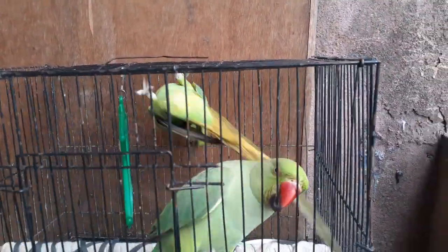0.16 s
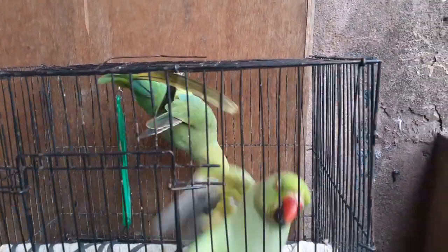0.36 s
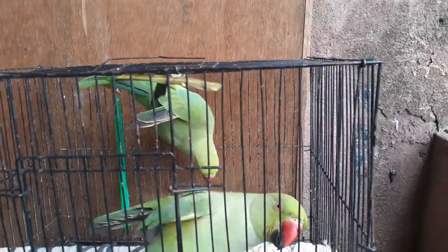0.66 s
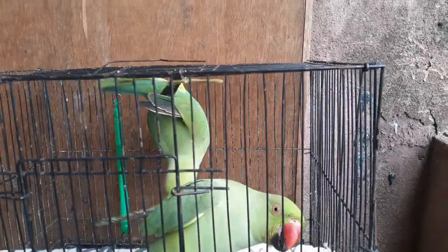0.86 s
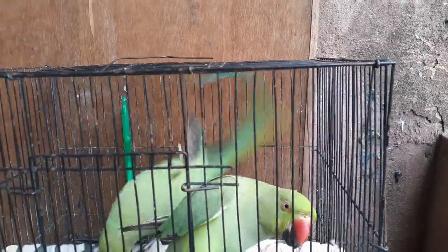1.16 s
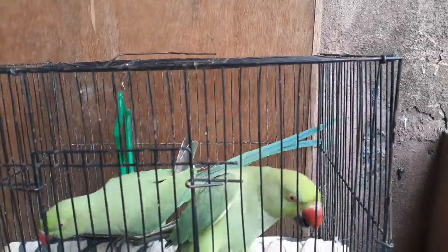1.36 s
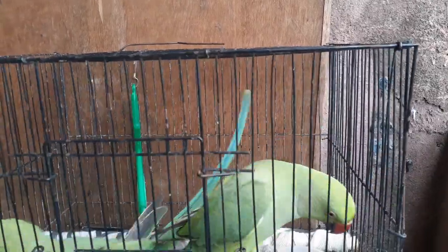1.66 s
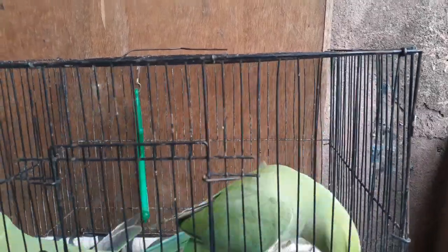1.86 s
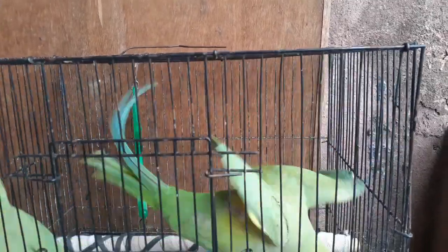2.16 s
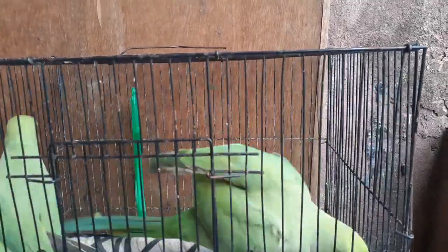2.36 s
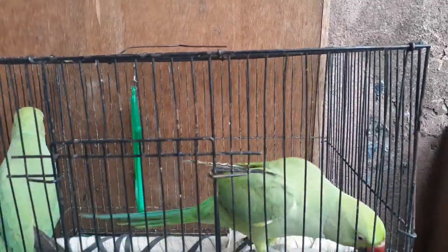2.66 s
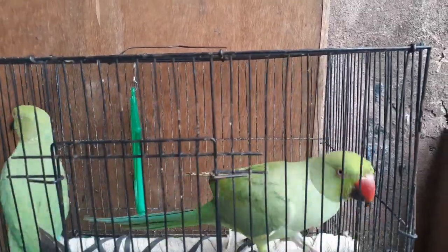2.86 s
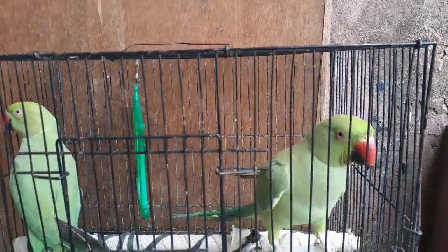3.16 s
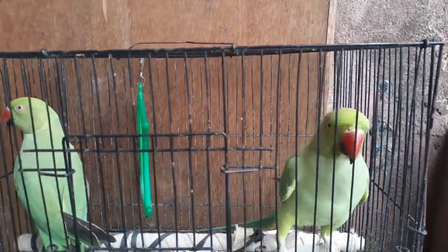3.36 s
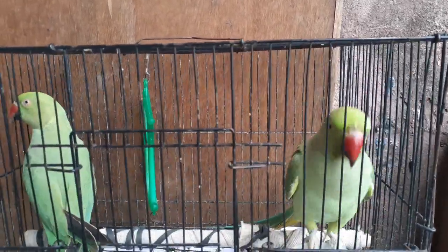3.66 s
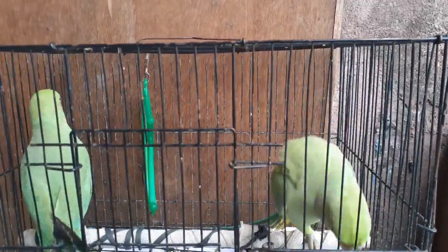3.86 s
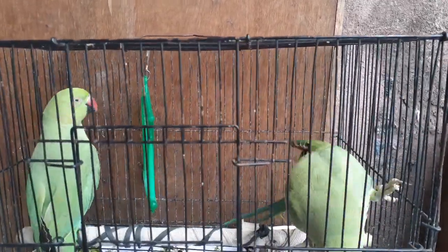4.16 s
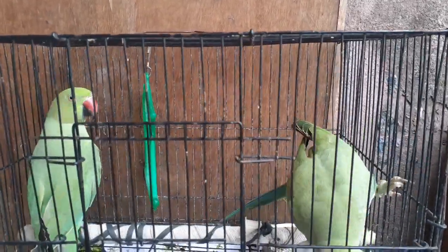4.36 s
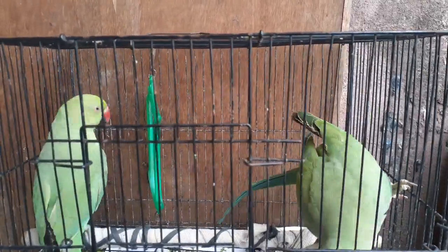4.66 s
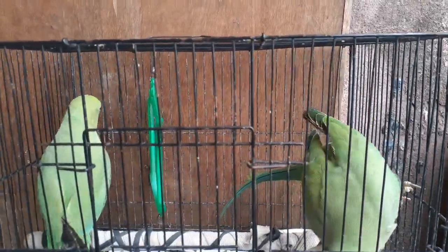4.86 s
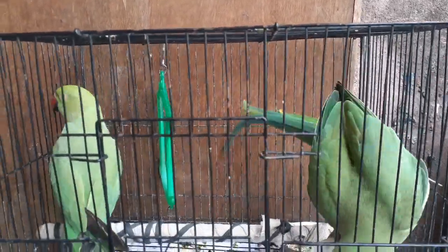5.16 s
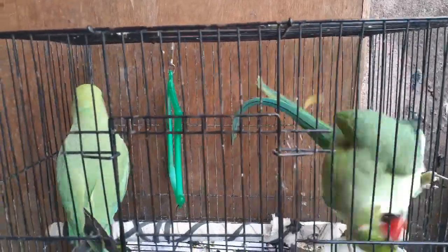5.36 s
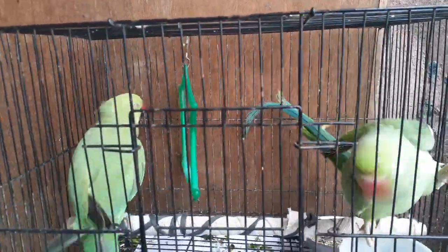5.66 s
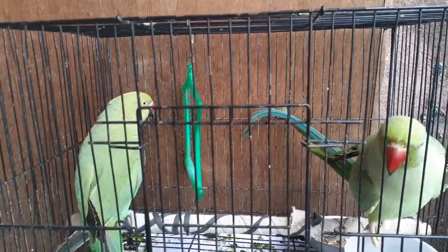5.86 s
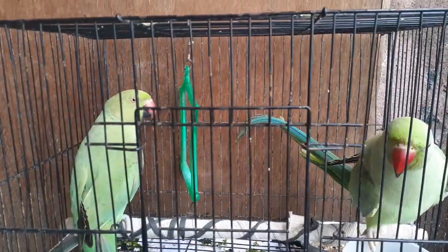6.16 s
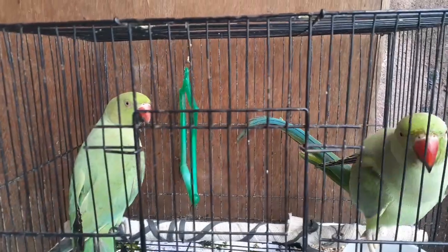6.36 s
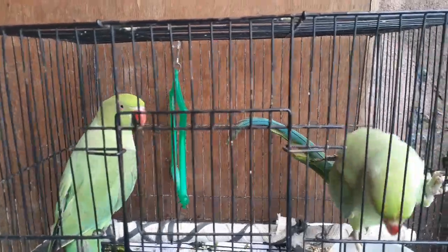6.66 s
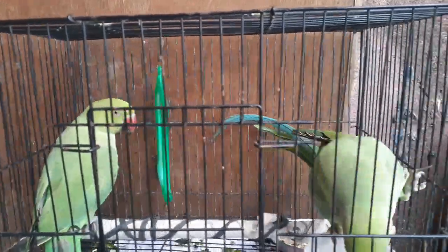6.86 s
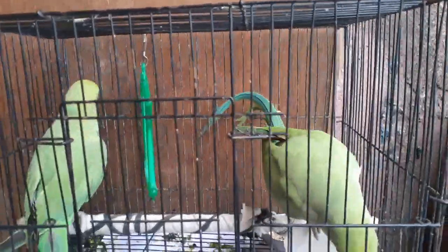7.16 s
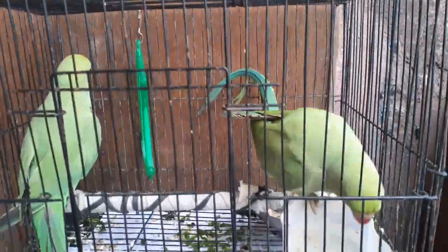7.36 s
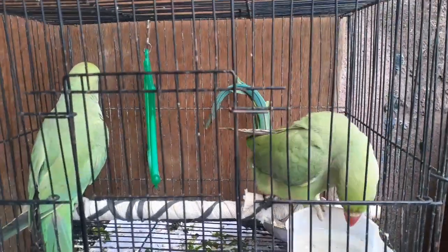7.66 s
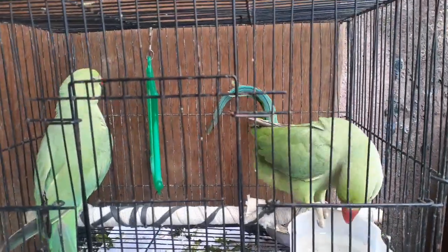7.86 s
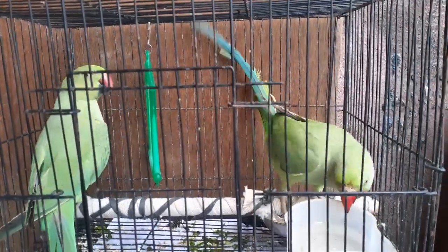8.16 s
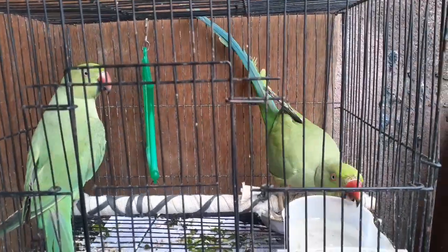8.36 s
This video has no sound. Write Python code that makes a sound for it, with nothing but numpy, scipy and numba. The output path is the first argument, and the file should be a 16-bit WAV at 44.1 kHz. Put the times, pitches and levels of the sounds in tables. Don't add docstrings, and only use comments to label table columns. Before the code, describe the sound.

Close phone pickup of a wire cage in a small hard-walled yard. The tail of a shrill parakeet squawk opens it, then claws and beak tick on ringing wires as a bird clambers down, loudest with a sharp clack about two seconds in. Ticks thin out, then three more piercing squawks rise and fall quickly. Light feather and paper rustle, low town hum beneath.

```python
import sys
import numpy as np
from scipy import signal
from scipy.fft import rfft, irfft, next_fast_len
from scipy.io import wavfile
from scipy.ndimage import uniform_filter1d, minimum_filter1d
from numba import njit

SR = 44100
rng = np.random.default_rng(int(sys.argv[2]) if len(sys.argv) > 2 else 0)


def transcribe(signal):
    frames = np.atleast_2d(signal).T
    limited = np.clip(frames, -1, 1)
    pcm = np.round(limited * 32767).astype(np.int16)
    wavfile.write(sys.argv[1], SR, pcm)


def nominal_scale(level):
    x = np.asarray(level, float) / 20
    return 10 ** x


N = 375291
T = np.arange(N) / SR


def on_log(hz, points):
    f, v = np.transpose(points)
    return np.interp(np.log(np.maximum(hz, 1)), np.log(f), v)


def colour(x, points):
    size = next_fast_len(x.shape[-1])
    gain = nominal_scale(on_log(np.fft.rfftfreq(size, 1 / SR), points))
    return irfft(rfft(x, size) * gain, size)[..., :x.shape[-1]]


def band(x, lo_hz, hi_hz):
    y = signal.sosfilt(signal.butter(2, [lo_hz, hi_hz], "band", fs=SR, output="sos"), x)
    return y / y.std()


def walk(rate_hz):
    hold = int(SR / rate_hz)
    steps = np.repeat(rng.standard_normal(N // hold + 1), hold)
    smooth = uniform_filter1d(uniform_filter1d(steps, hold), hold)[:N]
    return smooth / smooth.std()


def ports(x, pan_db, lag):
    late = np.concatenate([np.zeros(lag), x[:N - lag]])
    return np.array([late * nominal_scale(pan_db / 2), x * nominal_scale(-pan_db / 2)])


def arch(t, s, v):
    slope = np.diff(v) / np.diff(s)
    before, after = slope[:-1], slope[1:]
    inner = np.where(after * before > 0, 2 * after * before / (after + before + 1e-9), 0)
    tangent = np.r_[slope[0], inner, slope[-1]]
    i = np.clip(np.searchsorted(s, t) - 1, 0, len(s) - 2)
    h = s[i + 1] - s[i]
    u = np.clip((t - s[i]) / h, 0, 1)
    bend = (1 - u) * (tangent[i] - slope[i]) - u * (tangent[i + 1] - slope[i])
    return v[i] + h * u * (slope[i] + (1 - u) * bend)


# f/Hz, then level/dB of the first voice, of sums and of doubled sums
SECOND_MEMBRANE = (2740, -10, -17, -14)
# start t/s, end t/s
CRACK = (6.513, 6.557)
# f/Hz, level/dB
THROAT_TONE = [(600, -21.5), (1000, -23), (1400, -12.5), (2000, -11.5), (2450, 0.5), (2900, 8), (3400, -5),
               (4300, -6), (5300, -11), (6500, -8.5), (7400, -18), (8500, -19.5), (10000, -34.5),
               (13000, -33), (16000, -46.5)]


def squawk(rows, waver, flutter, breath):
    s, pitch, *columns = np.array(rows, float).T
    span = slice(int(s[0] * SR), int((s[-1] + 0.016) * SR))
    t = T[span]
    db, bright_db, rough = (np.interp(t, s, c) for c in columns)
    second_hz, first_db, sum_db, twice_db = SECOND_MEMBRANE
    both = np.clip(np.minimum(t - CRACK[0], CRACK[1] - t) / .003, 0, 1)
    rough = np.clip(rough, 0, 1) + .3 * both
    hz = arch(t, s, pitch) * (1 + .08 * rough * waver[span])
    phase = 2 * np.pi * np.cumsum(hz) / SR
    second_phase = 2 * np.pi * second_hz * np.cumsum(1 + .008 * waver[span][::-1]) / SR

    harmonics = [(k, 0) for k in range(1, 22)]
    mixtures = [(k, n) for n in (1, 2) for k in range(1 - n, 4)]
    k, n = np.array(harmonics + mixtures).T[..., None]
    second_alone = nominal_scale(-12.0 * (n - 0.46))
    sums = nominal_scale(np.where(n == 1, sum_db, twice_db))
    share = np.where(n == 0, nominal_scale(first_db * both), both * np.where(k == 0, second_alone, sums))
    f = k * hz + n * second_hz
    gain = share * nominal_scale(on_log(f, THROAT_TONE) + bright_db * np.log2(f / 3000)) * (f < 16000)
    gain /= np.sqrt(uniform_filter1d((gain ** 2).sum(axis=0) / 2, size=500))
    own = flutter[np.arange(len(t)) + 5000 * np.arange(len(k))[:, None] + span.start // 2]
    gain *= nominal_scale(np.minimum(1.4 * f / 3000, 6.5) * own)
    voice = (gain * np.sin(k * phase + n * second_phase + k ** 2)).sum(axis=0)

    fade_in = np.clip((t - s[0]) / 0.0017 + (s[0] == 0), 0, 1)
    fade_out = np.clip((t[-1] - t) / .01, 0, 1) ** 2
    out = np.zeros(N)
    out[span] = (voice + 0.3 * rough * breath[span]) * nominal_scale(db) * fade_in * fade_out
    return out


# t/s, pitch f/Hz, level/dB
CALLS = [
    [(0.0, 1970, -18.5), (0.014, 1860, -17), (0.025, 1757, -14), (0.035, 1580, -13.5), (0.058, 1463, -15),
     (0.072, 1413, -10.5), (0.088, 1362, -12.5), (0.118, 1378, -16.5), (0.125, 1408, -22.5)],
    [(4.718, 1963, -15), (4.735, 2064, -11), (4.776, 2173, -15.5), (4.805, 2095, -12), (4.845, 1809, -16),
     (4.87, 1594, -15), (4.9, 1472, -13.5), (4.925, 1412, -15.5), (4.955, 1454, -20.5)],
    [(5.299, 1958, -18), (5.332, 2071, -16.5), (5.354, 2128, -20), (5.372, 2010, -18), (5.397, 1675, -20.5),
     (5.425, 1522, -13.5), (5.473, 1432, -13.5), (5.499, 1434, -15), (5.515, 1420, -24.5)],
    [(6.464, 1904, -19.5), (6.503, 2066, -20.5), (6.516, 2376, -18.5), (6.55, 2237, -19),
     (6.604, 1817, -20.5), (6.665, 1521, -13), (6.741, 1352, -15), (6.757, 1331, -9.5), (6.795, 1291, -22)],
]
# climb length t/s, first level/dB, climb level/dB, arch roughness [0-1],
# brightness [dB per octave]
CALL_OPENINGS = [
    (0, -20, -20, .17, 0.7),
    (.038, -18, -13, 0.12, 0.5),
    (.041, -33.5, -16, 0.11, -0.3),
    (.025, -32, -19.5, .06, -1.05),
]
# f/Hz, level/dB
BREATH_TONE = [(1500, -31.5), (3000, -15.5), (6000, -10), (9000, -17.5), (13000, -20.5), (16000, -23.5)]
CLIMB_FROM_HZ, CLIMB_CURVE, CLIMB_ROUGH = 570, 2.1, .3


def parakeet():
    waver, flutter = walk(500), walk(110)
    breath = colour(rng.standard_normal(N), BREATH_TONE)
    breath /= breath.std()
    out = 0
    for call, (length, first_db, climb_db, rough, bright_db) in zip(CALLS, CALL_OPENINGS):
        rows = [(*row, bright_db, rough) for row in call]
        s, top_hz, _ = call[0]
        climb = []
        for v in np.arange(6) / 6:
            hz = CLIMB_FROM_HZ + (top_hz - CLIMB_FROM_HZ) * v ** CLIMB_CURVE
            db = climb_db + (first_db - climb_db) * (1 - v) ** 6.1
            climb.append((s - length * (1 - v), hz, db, bright_db, CLIMB_ROUGH))
        out = out + squawk(climb + rows if s > 0 else rows, waver, flutter, breath)
    return out


# f/Hz, width f/Hz, level/dB
WIRE_MODES = [(3250, 240, -17), (3830, 1500, 2.5), (4900, 810, 0), (6480, 6900, 0), (10900, 3500, -3),
              (14220, 2500, -14)]
# t/s, peak level/dB, ring f/Hz, left minus right
# level/dB, treble tilt level/dB
WIRE_TICKS = [(0.1951, -24.5, 4800, -10.5, -4), (0.2423, -26, 4230, -10.5, -5),
              (0.3273, -29.5, 4090, -5.5, -1), (0.3377, -19, 3496, -8, -4),
              (0.41, -28, 3320, -6.5, -7.5), (0.7671, -39.5, 3320, -12, -26.5),
              (0.848, -35, 6566, -10.5, -8), (0.9058, -37, 3330, -10, -12),
              (0.9328, -41, 3380, -14.5, -4), (1.0847, -23.5, 8780, -13.5, -6),
              (1.2239, -31.5, 10500, -13, 0), (1.2496, -35, 4330, -19, 0), (1.37, -40.5, 8400, -4.5, 9),
              (1.6565, -24.5, 8400, -8.5, -1.5), (1.698, -39, 3580, -2, -12),
              (1.736, -30, 5170, -0.6, -4), (2.0014, -23.5, 9640, -8, -6), (2.06, -27.5, 3714, -3, -11),
              (2.0873, -8.5, 8200, -5.5, -1.5), (2.1057, -20, 3260, -5, -5.5),
              (2.112, -25.5, 4150, -0.6, -5),
              (2.21, -31, 3250, 1.5, -16), (2.2769, -37, 3420, -13, 1.1), (2.2999, -32, 4793, 0, 4),
              (2.324, -34, 3727, -2.5, -21), (2.4434, -30, 4630, -2, -2), (2.4944, -43, 2700, -15, 3),
              (2.6934, -16, 3600, -9.5, -2), (2.7008, -26.5, 3470, -10, 2), (3.0125, -26, 8360, -9, -7),
              (3.5511, -37, 8250, 2.1, -3), (3.6334, -21.5, 5240, -4.5, -6), (3.6394, -17, 3470, -6.5, -4),
              (3.6503, -23, 3340, -3.5, -6.5), (4.0649, -37, 3763, -11, -22), (5.7448, -43.5, 3220, -9, -4),
              (7.4487, -46.5, 9240, -4.5, 2.1), (7.7232, -38.5, 2710, -4.5, -5),
              (8.085, -26, 5620, -12, -5), (8.3621, -39, 3250, -3, -25.5)]


def ticks():
    size = 4096
    out, t = np.zeros((2, N + size)), T[:size]
    f = np.fft.rfftfreq(size, 1 / SR)
    thin = (1j * f / (3000 + 1j * f)) ** 4
    wire = sum(nominal_scale(db) / (1 + 1j * (f - hz) / (width / 2)) for hz, width, db in WIRE_MODES)
    events = WIRE_TICKS
    noise = rng.standard_normal((len(events), 2, size))
    for (s, db, hz, pan_db, tilt_db), (crack, tail) in zip(events, noise):
        struck = 2.6 / (1 + 1j * (f - hz) / (0.036 * hz))
        body = thin * (wire + struck) * nominal_scale(on_log(f, [(5000, 0), (8000, tilt_db)]))
        skid_lag = 60 + int(150 * abs(tail[0]))
        blow = t * np.exp(-t / 0.00046) + 0.54 * np.roll(t * np.exp(-t / 0.00036), skid_lag)
        strike = crack * blow / blow.max() + nominal_scale(-22.5) * tail * np.exp(-t / .006)
        y = irfft(rfft(strike) * body)
        y *= nominal_scale(db) / np.abs(y).max()
        i = int(s * SR)
        out[0, i + 14:i + size] += y[:-14] * nominal_scale(pan_db / 2)
        out[1, i:i + size] += y * nominal_scale(-pan_db / 2)
    return out[:, :N]


# t/s, f/Hz, peak level/dB, T60 t/s
BAR_RINGS = [(0.456, 900, -46.5, 0.043), (1.124, 1213, -50.5, 0.83), (1.125, 1520, -61, 0.36),
             (2.062, 1380, -30, 0.018), (2.062, 1950, -37, 0.018), (2.087, 1530, -27, 0.012),
             (2.087, 714, -38.5, .03), (2.108, 177, -32.5, 0.047), (2.211, 3200, -51, 0.3),
             (2.324, 1250, -40, .03), (2.444, 2710, -55, 0.36), (3.552, 6550, -55, .3),
             (3.62, 2300, -46, .03), (4.066, 1405, -43, 0.42), (4.065, 4520, -47, 0.12)]


def thump():
    out = np.zeros(N)
    for s, hz, db, t60 in BAR_RINGS:
        t = T[:int(t60 * SR)]
        i = int(s * SR)
        swing = np.sin(2 * np.pi * hz * t) + .4 * np.sin(2 * np.pi * 1.03 * hz * t)
        out[i:i + len(t)] += nominal_scale(db - 60 * t / t60) * swing
    return ports(out, -10.0, 14)


# f/Hz, level/dB per Hz
FEATHER_TONE = [(2650, -61.5), (4500, -30.5), (5750, 11.5), (8230, 16.5), (15100, 9.5), (16100, -5),
                (16500, -39)]
# t/s, level/dB, rise t/s, T60 t/s, paper minus feather level/dB
SHIVER_EVENTS = [(.34, -52, .001, 0.075, -6), (0.411, -55.5, 0.0011, 0.39, -1),
                 (1.125, -56, 0.016, 0.53, 2.5), (1.2, -52, .03, 0.27, 2),
                 (1.368, -55.5, 0.0011, 0.099, -11), (1.657, -63, 0.00082, 0.26, 0.5),
                 (1.738, -48, 0.0014, 0.31, -15), (2.002, -57.5, .001, 1.2, -6),
                 (2.093, -36.5, 0.0049, 0.13, -4), (2.21, -68, 0.0022, 0.4, 13), (2.27, -62, 0.054, .7, -8),
                 (2.444, -63.5, .001, 1, 1), (2.70, -47, .001, 0.1, -31), (3.011, -46, 0.0021, 0.32, -16),
                 (3.552, -51.5, 0.0024, 0.44, -14), (3.65, -60, 0.0023, 0.57, -2),
                 (3.78, -56.5, .1, 1.2, -4), (4.066, -69, .002, 0.24, 18.5), (7.05, -71.5, 0.017, 0.33, -5),
                 (8.088, -59, .001, 0.079, -11), (8.13, -58, 0.026, 0.23, -15),
                 (8.319, -64.5, .01, 0.16, 7)]
FEATHER_BED_DB, PAPER_BED_DB = -73, -62.5


def rustle():
    grains = rng.standard_normal((3, N)) * nominal_scale(3.0 * np.minimum(rng.exponential(size=(3, N)), 6))
    duck_db = ducking()
    high, low = nominal_scale(FEATHER_BED_DB + duck_db), nominal_scale(PAPER_BED_DB + duck_db)
    for start, db, rise, t60, paper_db in SHIVER_EVENTS:
        span = slice(int(start * SR), int((start + t60) * SR))
        t = T[span] - start
        shape = (1 - np.exp(-t / rise)) * nominal_scale(db - 60 * t / t60)
        high[span] += shape
        low[span] += shape * nominal_scale(paper_db)
    mesh = np.c_[np.geomspace(5000, 16000, num=70), 2.5 * rng.standard_normal(70)]
    feather = colour(colour(grains, FEATHER_TONE), mesh)
    feather = feather / feather.std() * high * nominal_scale(0.79 * walk(60))
    paper = np.array([band(g, 900, 4400) for g in grains]) * low * nominal_scale(1.0 * walk(90))
    near, left, right = feather + paper
    return ports(near, -13.0, 14) + 1.3 * np.array([left, right])


def early(x):
    level_db, spread_s = -2, .009
    paths, spots = np.zeros((2, 512)), rng.random((2, 12))
    for path, spot in zip(paths, spots):
        lag = 30 + (SR * spread_s * spot ** 2).astype(int)
        path[lag] += rng.standard_normal(12) * (1 - .6 * spot) / np.sqrt(6)
    return nominal_scale(level_db) * signal.oaconvolve(x[None], paths, axes=1)[:, :N]


@njit
def walls(x, lags, gain, damp):
    line, soft, out = np.zeros((8, 4096)), np.zeros(8), np.zeros((2, len(x)))
    for i in range(len(x)):
        total = 0.
        for k in range(8):
            soft[k] += (1 - damp) * (gain[k] * line[k, (i - lags[k]) & 4095] - soft[k])
            total += soft[k]
            out[k % 2, i] += soft[k]
        for k in range(8):
            line[k, i & 4095] = x[i] + soft[k] - total / 4
    return out


# f/Hz, level/dB per Hz
TOWN_TONE = [(15, -52.5), (25, -23.5), (80, 1), (118, -5.5), (159, -1), (197, -11), (288, -9.5),
             (349, -8.5), (389, -3), (470, -5.5), (1730, -26.5), (2600, -27.5), (6380, -42.5),
             (9580, -40.5), (16500, -50)]
TOWN_DB = -44.5


def town():
    alone = [(100, -19.5), (300, -22.5), (700, 3.5), (1500, 7.5)]
    # f/Hz, level/dB
    shared = [(100, -3.0), (300, 4), (700, -10), (1500, 10.5), (4000, -29.5)]
    mid, left, right = (colour(rng.standard_normal(N), TOWN_TONE) for _ in range(3))
    both = ports(colour(mid, shared), -1.5, 15)
    both = both + [colour(left, alone) * nominal_scale(0.16), colour(right, alone)]
    return both / both.std() * nominal_scale(TOWN_DB + ducking() + 0.27 * walk(3))


DUCK_DEPTHS = [
    -6.5,
    -8.5,
    -9.5,
    -8,
]
DUCK_IN_S, DUCK_HOLD_S, DUCK_OUT_S = .17, 0.89, 1.2


def ducking():
    dips = []
    for call, db in zip(CALLS, DUCK_DEPTHS):
        start, end = call[0][0] - (call[0][0] == 0), call[-1][0]
        sink = (T - start) / DUCK_IN_S
        recover = 1 - (T - end - DUCK_HOLD_S) / DUCK_OUT_S
        dips.append(db * np.clip(np.minimum(sink, recover), 0, 1))
    return np.min(dips, axis=0)


# f/Hz, level/dB
LEFT_SHADE = [(1400, 5.5), (2000, -5), (3000, -2), (4200, -6), (5000, -1), (6500, -1), (8500, 0),
              (12000, 1.5)]
YARD_T60_S, YARD_DAMP, YARD_DB, YARD_PAN_DB = 0.23, .3, -8.5, -2.5


def scene():
    bird, wires = parakeet(), ticks()
    lags = np.array([433, 677, 947, 1259, 1601, 1979, 2411, 2903])
    yard = walls(bird + .5 * wires[1] + 1e-18, lags, nominal_scale(-60 * lags / SR / YARD_T60_S), YARD_DAMP)
    yard = yard * nominal_scale(YARD_DB + np.array([[.5], [-.5]]) * YARD_PAN_DB)
    left, right = ports(bird, 0, 18) + early(bird)
    near = np.array([colour(left, LEFT_SHADE), right]) * nominal_scale(2.5)
    return near + yard + wires + rustle() + town() + thump()


def roll_off(x):
    return signal.sosfilt(signal.butter(12, 16830, fs=SR, output="sos"), x)


# f/Hz, level/dB
MICROPHONE_TONE = [(20, -8), (34, 0), (14500, 0), (15700, -3.5), (16100, -20), (20000, -39.5)]


def record(dry):
    room_left = np.minimum(1, .97 / (np.abs(dry).max(axis=0) + 1e-9))
    gain = uniform_filter1d(minimum_filter1d(room_left, size=257), size=257)
    return roll_off(colour(dry * gain, MICROPHONE_TONE))


dry = scene()
out = record(dry)
transcribe(out)
```